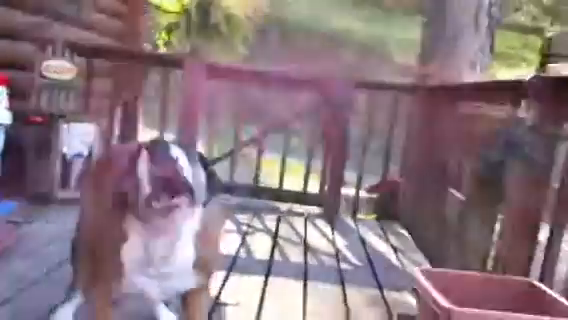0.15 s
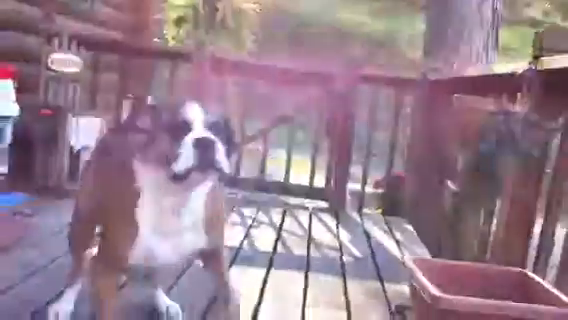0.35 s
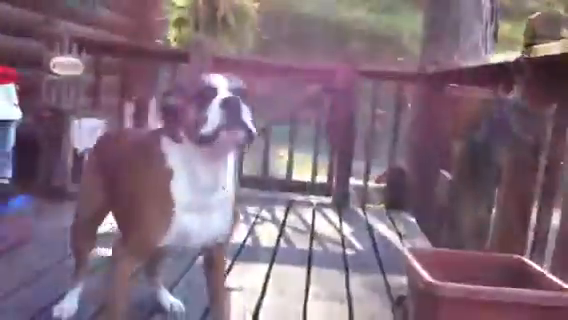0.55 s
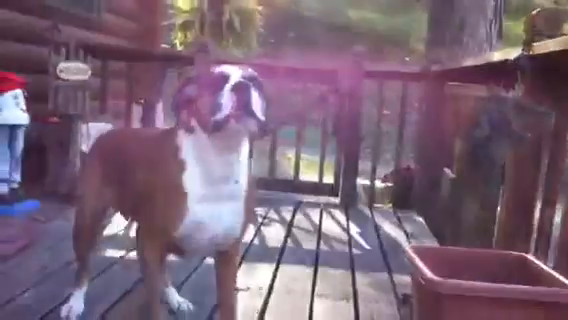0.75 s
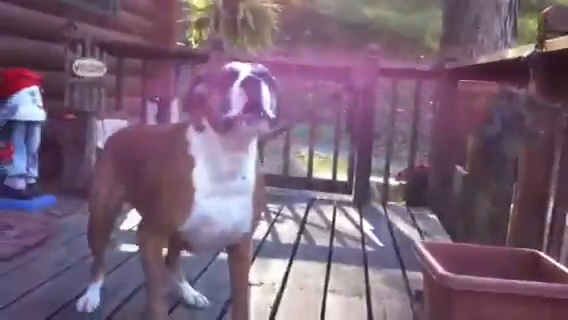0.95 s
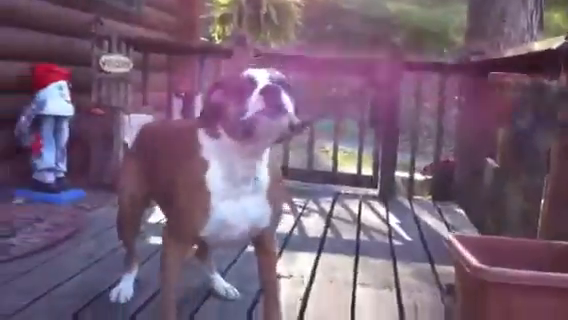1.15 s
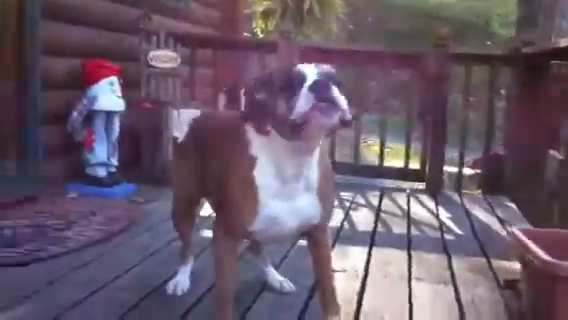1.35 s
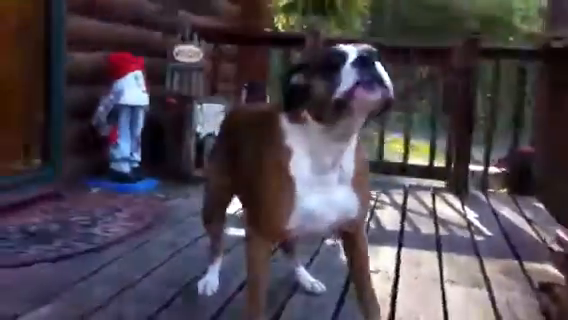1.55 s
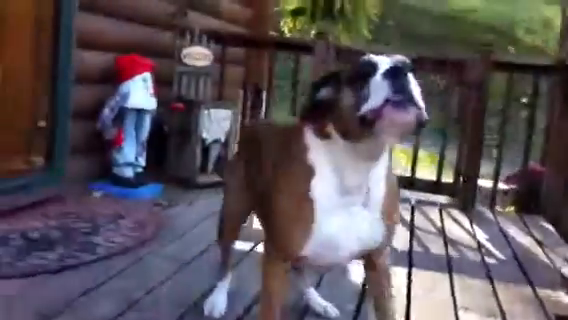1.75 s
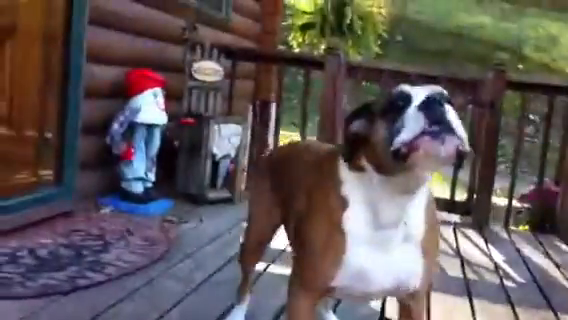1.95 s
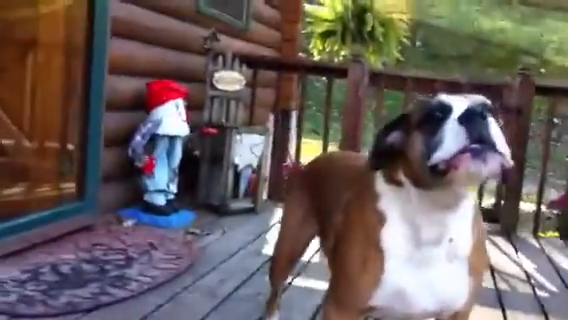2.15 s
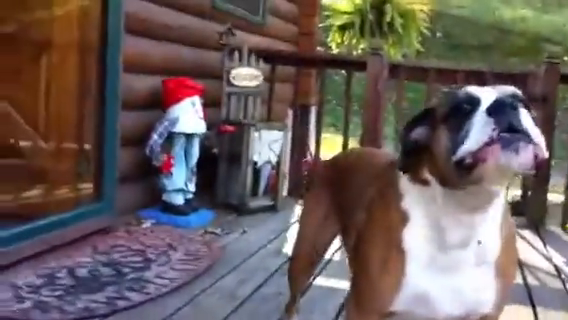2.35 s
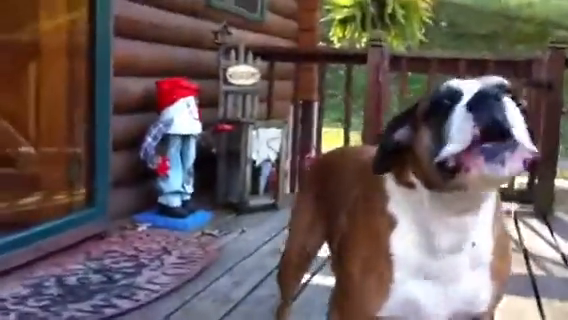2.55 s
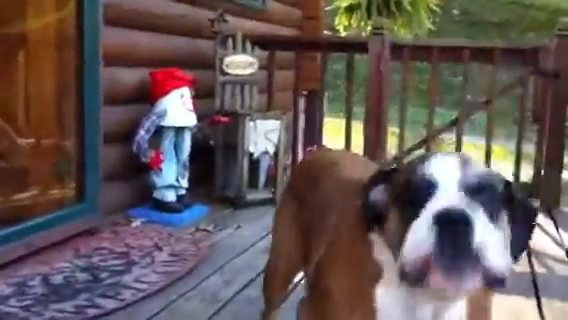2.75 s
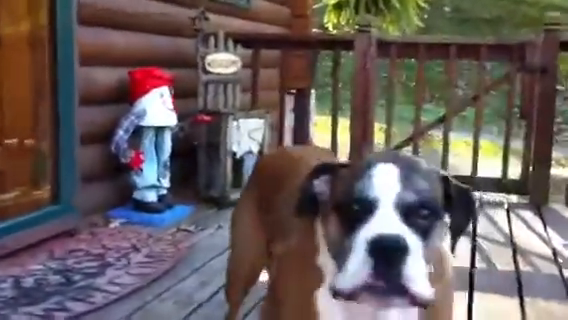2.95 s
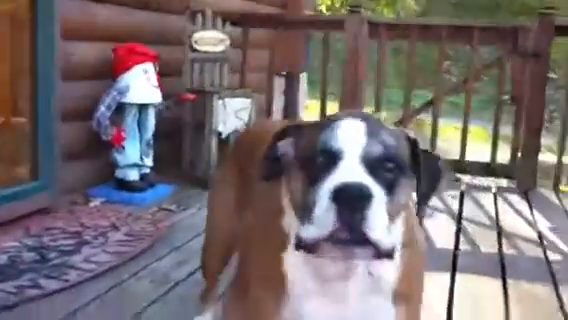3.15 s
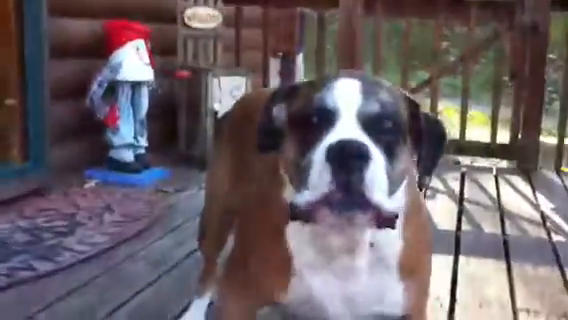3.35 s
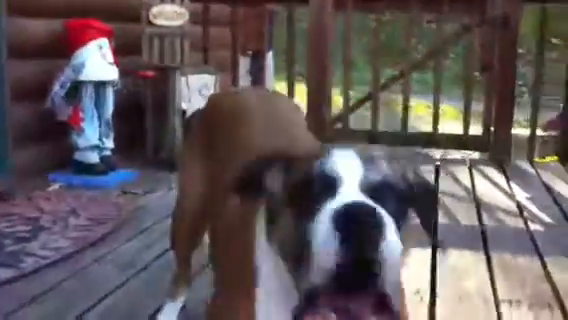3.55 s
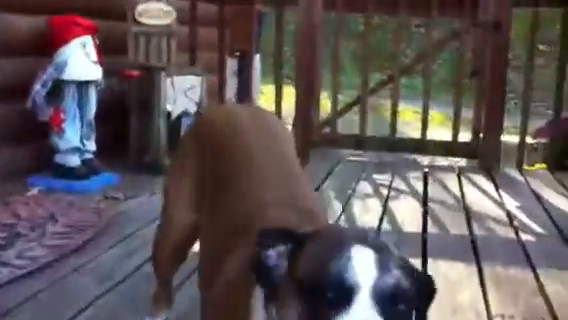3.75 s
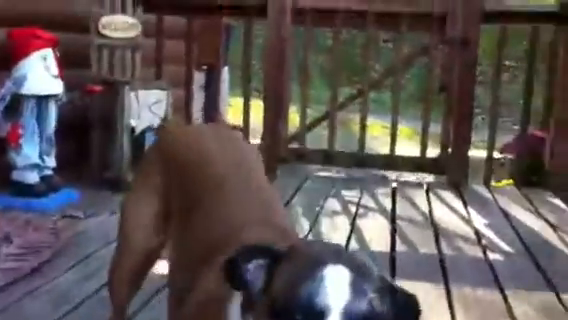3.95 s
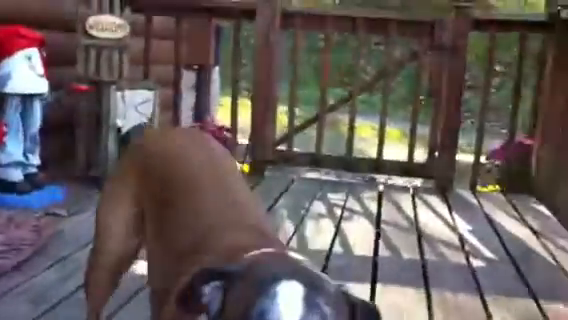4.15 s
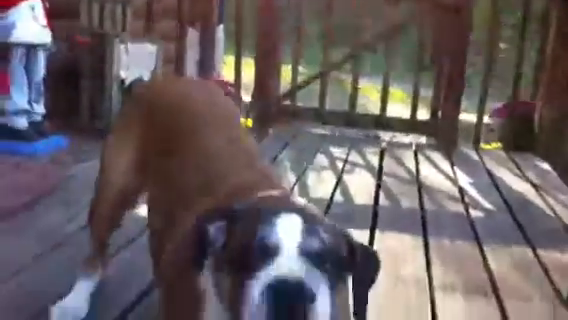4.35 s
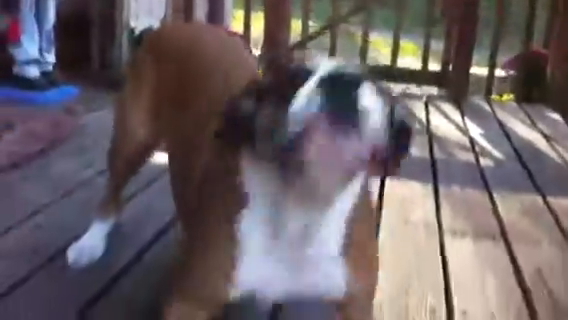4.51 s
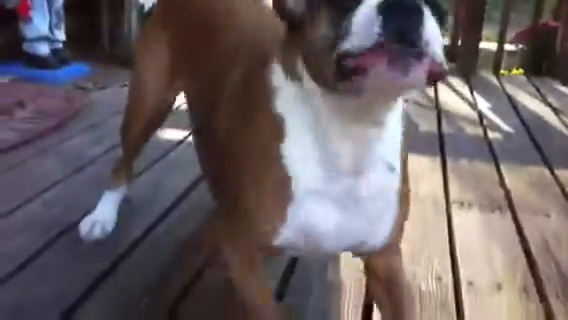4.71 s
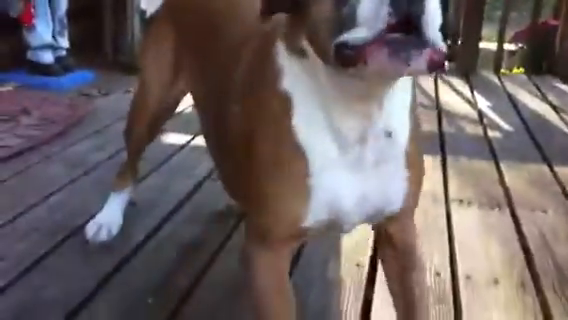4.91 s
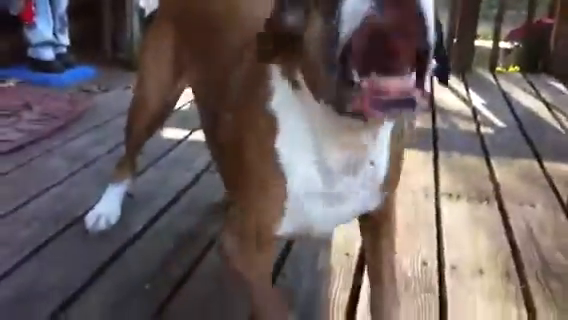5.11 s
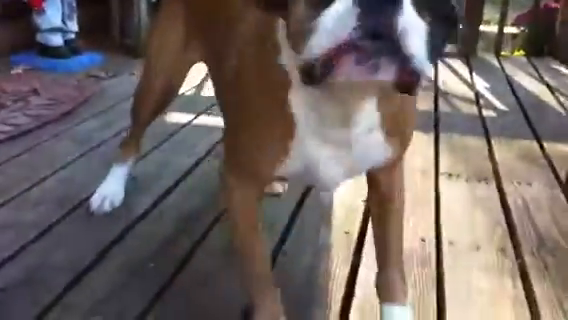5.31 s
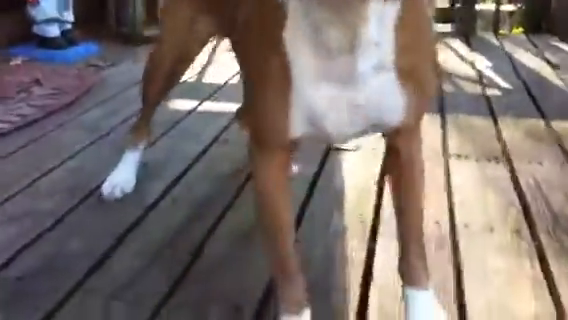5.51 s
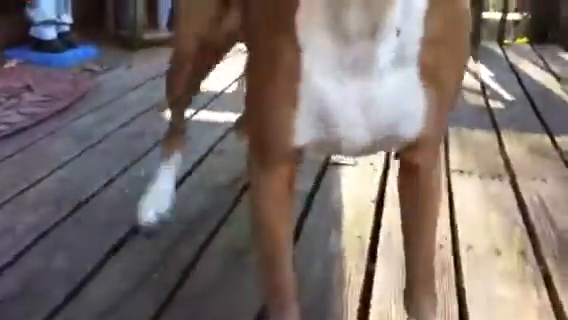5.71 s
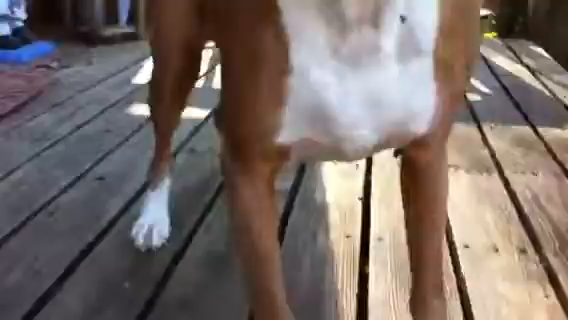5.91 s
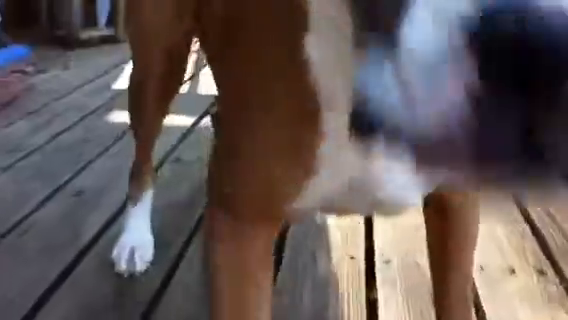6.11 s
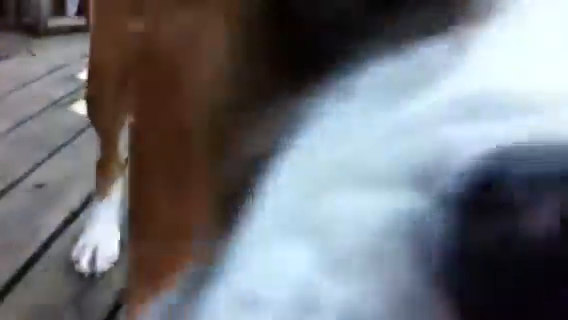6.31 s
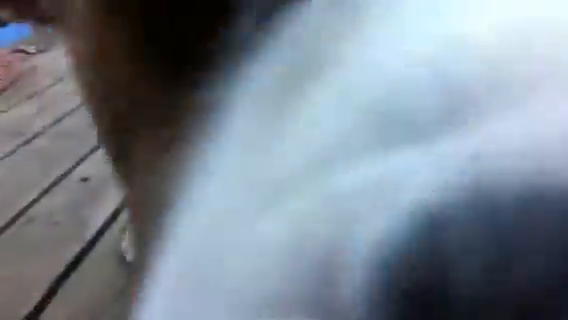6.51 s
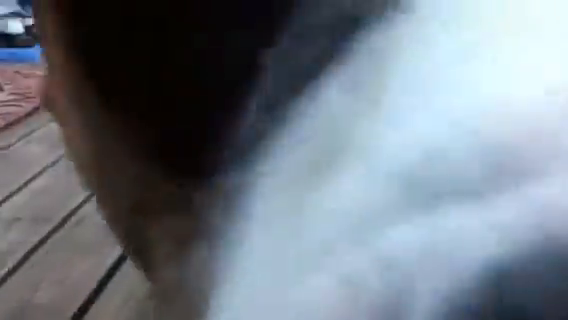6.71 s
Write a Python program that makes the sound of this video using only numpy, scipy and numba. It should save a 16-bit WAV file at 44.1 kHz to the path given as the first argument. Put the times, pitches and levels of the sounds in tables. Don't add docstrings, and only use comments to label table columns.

```python
import sys
import numpy as np
from scipy import signal
from scipy.fft import rfft, irfft
from scipy.io import wavfile
from scipy.ndimage import uniform_filter1d
from numba import njit

SR = 44100
rng = np.random.default_rng(int(sys.argv[2]) if len(sys.argv) > 2 else 0)


def unload_audio(sound):
    columns = np.transpose(np.atleast_2d(sound))
    steps = np.round(np.clip(columns, -1, 1) * 32767)
    wavfile.write(sys.argv[1], SR, steps.astype(np.int16))


def linear_from_db(decibels):
    return 10 ** (np.asarray(decibels, float) / 20)


N = 302967


def level(x, db):
    return x * linear_from_db(db) / np.sqrt(np.mean(x ** 2) + 1e-30)


def steady(x, span_s):
    k = int(span_s * SR)
    power = uniform_filter1d(uniform_filter1d(x ** 2, k), k)
    return x / np.sqrt(power + 1e-12)


def walk(rate_hz, count=N):
    k = int(SR / rate_hz)
    held = np.repeat(rng.standard_normal(count // k + 1), k)
    return uniform_filter1d(held, k)[:count]


def decay(t, t60_s):
    return np.exp(-np.log(1000) * t / t60_s)


def add_at(out, start_s, x):
    i = int(start_s * SR)
    out[i:i + len(x)] += x


@njit
def svf(x, hz, width):
    band, high, b, l = np.empty(len(x)), np.empty(len(x)), 0., 0.
    for i in range(len(x)):
        g, k = np.tan(np.pi * hz[i] / SR), width[i] / hz[i]
        v = (b + g * (x[i] - l)) / (1 + g * (g + k))
        band[i], high[i] = k * v, x[i] - k * v - l - g * v
        b, l = 2 * v - b, l + 2 * g * v
    return band, high


def resonate(x, modes):
    one, out = np.ones(len(x)), np.zeros(len(x))
    for k, (hz, width_hz, db) in enumerate(modes):
        out = out + (-1) ** k * linear_from_db(db) * svf(x, hz * one, width_hz * one)[0]
    return out


def patchy(modes, depth_db, rate_hz, count=N):
    return [(hz, width_hz, db + depth_db * walk(rate_hz, count)) for hz, width_hz, db in modes]


def swells(start_s, hold_s, db, fall_db_s):
    rise_db_s = 797
    t = np.arange(0, N, 32)[:, None] / SR
    lost_db = np.maximum(rise_db_s * (start_s - t), fall_db_s * (t - start_s - hold_s)).clip(0)
    gain = np.sqrt(np.sum(linear_from_db(db - lost_db) ** 2, axis=1))
    return np.interp(np.arange(N) / SR, t[:, 0], gain)


@njit
def folds(hz, jitter, shimmer, weak, chance):
    pulses, phase, p, k = np.zeros(len(hz) + 1), np.empty(len(hz)), 0., 0
    for i in range(len(hz)):
        step = hz[i] * np.exp(jitter[i] * chance[k, 0]) / SR
        p += step
        if p >= 1:
            p, k = p - 1, k + 1
            size = np.exp(shimmer[i] * chance[k, 1]) * (1 - weak[i] * (k % 2))
            pulses[i] += size * p / step
            pulses[i + 1] += size * (1 - p / step)
        phase[i] = p
    return pulses[:-1], phase


def barks():
    # t/s, f/Hz, level/dB, mouth opening/0-1
    woof = [(0.0, 188, -4, 0), (.01, 191.8, -18, 0.18), (0.025, 197.3, -28.5, 0.27),
            (.047, 197.5, -19, 0.12), (.061, 191.6, -32, 0.2), (.07, 186.3, -23, 0.04),
            (.088, 174, -33, .1), (.1, 182, -46.5, 0.44), (.15, 175, -62, 0.04)]
    bark_1 = [(.2, 313, -57.5, 1), (.222, 331.4, -18.5, 0.41), (0.238, 385.8, -7.5, 0.55),
              (.272, 499.2, -23, 0.65), (.29, 569.4, -16.5, 0.77), (0.31, 586.6, -10, 0.68),
              (0.328, 523.4, -22.5, 1), (0.349, 368.5, -15, 0.46), (0.388, 287.3, -64.5, 0.26)]
    bark_2 = [(2.692, 467.3, -30.5, 0.18), (2.721, 409.2, -18.5, 0.37), (2.743, 437.7, -6.5, 0.4),
              (2.758, 487.4, -15, 0.49), (2.778, 546.3, -10.5, 0.51), (2.789, 594, -18, 0.86),
              (2.828, 576.8, -6, 0.46), (2.851, 464.3, -8.5, 0.22), (2.909, 319, -71, 0.33)]
    bark_3 = [(3.638, 341, -30.5, 0.41), (3.661, 364.6, -14.5, 0.49), (3.676, 404, -9, 0.54),
              (3.686, 428.3, -7.5, 0.51), (3.693, 455.2, -19.5, 0.52), (3.742, 511.6, -8, 0.64),
              (3.76, 482.6, -22.5, 0.99), (3.785, 387, -12, 0.57), (3.825, 369, -73, .4)]
    bark_4 = [(4.513, 295, -30, 0.15), (4.531, 324.5, -20.5, 0.64), (4.536, 345.1, -9.5, 0.65),
              (4.568, 465.3, -9, 0.62), (4.59, 493.3, -17, 0.83), (4.628, 511.2, -18.5, 0.67),
              (4.652, 410.5, -26.5, 1), (4.668, 326.5, -19.5, 0.56), (4.699, 265, -78, 0.42)]
    bark_5 = [(5.248, 325.9, -21.5, 0.49), (5.268, 362, -9.5, 0.51), (5.282, 396.4, -12, 0.66),
              (5.301, 436.3, -13.5, 0.63), (5.306, 457.7, -28, 0.27), (5.335, 539.7, -18, 0.69),
              (5.362, 529, -13.5, 0.47), (5.391, 406, -26.5, 0.18), (5.43, 357, -67, 0.52)]
    # t of most air/s, breath level/dB, roughness/0-1, weak alternate pulse/0-1
    pushes = [
        (-.02, -33.5, 0.49, 0.05),
        (0.329, -32.5, 0.27, 0.3),
        (2.82, -28.5, 0.21, 0.79),
        (3.759, -27.5, 0.18, 0.73),
        (4.621, -26.5, 0.07, 0.7),
        (5.358, -32.5, 0.28, 0.3),
    ]
    # middle t/s, half length/s, hoarse start/s, resonance f scale/ratio
    uneven = [(0.0, 0.02, 0.022, 1.017), (0.323, 0.027, 0.01, 0.95), (2.814, 0.024, 0.019, 0.97),
              (3.725, 0.021, .02, 0.98), (4.563, 0.0087, 0.017, 1.03), (5.356, 0.03, .015, 1.007)]
    # extra level/dB on the resonances near 560, 800, 1050, 1460, 1730 Hz
    vowels = [(1, 2.2, 8.1, 5, -14.5), (-0.3, 1.8, -1.5, -2.5, -0.5), (-2.5, 0.1, 1.1, 3, 7.8),
              (1.6, 0.84, -1.5, -4.2, 2), (-0.5, 0.3, 4, 4.1, 0.1), (1.3, 0.1, 0, -2.5, -2)]
    late_vowels = [(-2, 3.9, 8, 2, 4.1), (3.9, 2.3, -8, 0.8, 0.1), (-1.6, 0.1, -1.5, 2.5, 2.3),
                   (5, 0.81, -3.5, 4, 0.1), (3.2, 0.1, -0.5, 4, 2.1), (1.9, 0.1, -2, 4.5, 4.1)]
    # f at most air/Hz, rise/(Hz/s), level over breath/dB
    teeth_rings = [(4600, 100, -10), (4420, 3300, -9), (4700, 2800, -4.5), (4740, 3400, -6),
                   (5040, 3800, -0.5), (4630, 10000, -3.5)]
    # f at most air/Hz, rise/(Hz/s), width/Hz
    pockets = [(3080, 500, 400), (3100, 999, 300), (3080, 1000.5, 270), (3100, 999.5, 420),
               (3200, 2500, 530), (3630, -2000, 700)]
    out = np.zeros(N)
    curves = (woof, bark_1, bark_2, bark_3, bark_4, bark_5)
    for curve, push, patch, vowel, late, teeth, pocket in zip(
            curves, pushes, uneven, vowels, late_vowels, teeth_rings, pockets):
        add_at(out, curve[0][0], bark(curve, *push, *patch, vowel, late, *teeth, *pocket))
    return out


def bark(curve, push_s, air_db, rough, weak, uneven_s, half_s, hoarse_s, stretch, vowel_db, late_db,
         teeth_hz, teeth_hz_s, teeth_db, pocket_hz, pocket_hz_s, pocket_width_hz):
    # f/Hz, width/Hz, level mouth shut/dB, level mouth open/dB
    tract_modes = [(216, 130, -9.5, -37.5), (560, 128.5, 13.5, -17), (801, 145, 5.5, -0.5),
                   (1077, 267, -11.5, -5.5), (1452, 256, -15, -7), (1754, 298, -24.5, -2),
                   (2230, 840, -24.5, -12), (2904, 900, -29, -31)]
    # f/Hz, width/Hz, level/dB
    breath_modes = [(2940, 450, -1), (3580, 1300, 4.5), (4025, 1900, 3.5), (5070, 890, 0), (5430, 820, -5),
                    (6800, 1200, -1.5), (6990, 510, -3.5), (8900, 450, -10.5), (10000, 1300, -18.5),
                    (11300, 800, -10), (13100, 500, -12), (14300, 660, -19.5), (10750, 15000, -23.5)]
    # t from most air/s, level/dB
    breath_shape = [(-.1, -9.5), (-.05, -4.5), (0, -0.5), (.024, -2.5), (.033, -12), (.09, -27.5)]
    vowel_turn = (-.07, -.03)
    s, *columns = np.transpose(curve)
    t = np.arange(s[0], s[-1], 1 / SR)
    n, one, push_t = len(t), np.ones(len(t)), t - push_s
    hz, db, mouth = (np.interp(t, s, c) for c in columns)

    breath_db = air_db + np.interp(push_t, *np.transpose(breath_shape))
    breath_db = breath_db + 3.4 * np.minimum(np.maximum.accumulate(db) - db.max() + 10.5, 0)

    weak_share = 0.24
    weak = weak * (weak_share + (1 - weak_share) * np.exp(-((t - uneven_s) / half_s) ** 2))
    weak = np.clip(weak, 0, 1)
    calm = 0.56 * rough + 0.015
    rough = np.clip(rough + 0.35 * np.exp(-(t - t[0]) / hoarse_s), 0, 1)
    chance = np.tanh(rng.standard_normal((400, 2)))
    pulses, phase = folds(hz, 0.046 * (calm + rough), 0.93 * (calm + rough), weak, chance)
    pulses = level(pulses, 0)
    puff = np.exp(-phase / 0.63) * rng.standard_normal(n)
    rasp = signal.sosfilt(signal.butter(2, 1100, "high", fs=SR, output="sos"), puff)

    resonance_scale = stretch - 1.4 * np.clip(.3 - mouth, 0, .4)
    vowel = [np.interp(push_t, vowel_turn, pair) for pair in zip(vowel_db, late_db)]
    tract = []
    for (f, width_hz, shut_db, open_db), extra_db in zip(tract_modes, (0, *vowel, 0, 0)):
        mode_db = shut_db + mouth * (open_db - shut_db) + extra_db
        tract.append((f * resonance_scale, width_hz, mode_db / 2))
    tract = patchy(tract, 0.99, 39.6, n)
    voice = pulses + rough * (.8 * puff + 9 * rasp)
    voice = resonate(resonate(voice, tract), tract)
    for _ in range(3):
        voice = svf(voice, 0.87 * hz, 1.51 * 0.4 * hz)[1]
    voice = voice - 0.56 * resonate(voice, [(370, 150, 0)])

    jet = pulses + 10 * rough * puff
    air = resonate(jet, patchy(breath_modes, 3.5, 45, n))
    teeth_width_hz = 220
    teeth = svf(jet, teeth_hz + teeth_hz_s * push_t, teeth_width_hz * one)[0]
    air = level(air, 0) + level(teeth, teeth_db - 5)
    flutter_db = 2.0 * walk(120, n)

    fade = np.minimum(1, np.minimum(t - t[0] + 1 / SR, t[-1] - t) / 0.003)
    sound = linear_from_db(db) * steady(voice, 0.028) + linear_from_db(breath_db + flutter_db) * steady(air, 0.027)
    sound = fade * sound
    for _ in range(2):
        sound = sound - 0.62 * svf(sound, pocket_hz + pocket_hz_s * push_t, pocket_width_hz * one)[0]
    return sound


def grumble():
    # start t/s, hold/s, throat level/dB, throat f/Hz, mouth relative level/dB
    growls_and_huffs = [(1.1, 0.011, -52, 443, -1.5), (3.27, 0.2, -45, 932, -8), (3.44, 0.052, -56.5, 914, 3.5),
                        (3.51, 0.29, -40.5, 733, -9), (4.04, 0.16, -42.5, 600, -10.5), (4.235, 0.066, -49.5, 506, -9),
                        (4.425, 0.016, -41.5, 588, -19), (4.463, .2, -38, 536, -12.5), (4.72, .05, -51, 1015, -8.5),
                        (4.775, 0.049, -44, 720, -10), (4.84, 0.064, -40, 642, -12.5),
                        (4.92, 0.039, -46.5, 733, -1.5), (4.98, 0.19, -48, 861, -6.5),
                        (0.156, 0.088, -52.5, 807, -0.5), (0.375, 0.0067, -39.5, 597, -14),
             (0.521, 0.071, -48.5, 597, -3), (0.652, 0.067, -53, 515, -9), (0.769, 0.01, -52.5, 509, -10.5),
             (0.93, 0.12, -55.5, 614, 3), (1.04, 0.07, -44.5, 1136, -12), (1.19, 0.036, -58, 514, -5),
             (1.418, 0.042, -55, 510, -6.5), (1.584, 0.058, -56.5, 538, -1),
             (1.969, 0.15, -53.5, 560, -3.5), (2.275, 0.038, -59, 543, -0.5), (2.367, 0.081, -50, 466, -9),
             (2.45, 0.1, -60, 426, -12.5), (2.592, 0.12, -50, 455, -13), (2.89, 0.1, -50, 493, -12.5),
             (3.031, 0.085, -52, 507, -12), (3.826, 0.14, -55, 635, -10), (5.431, 0.2, -49, 621, -10),
             (5.7, 0.048, -53, 693, -4), (5.799, 0.038, -47.5, 429, -5.5), (5.924, 0.099, -56, 511, -3),
             (6.277, 0.11, -56.5, 440, -4), (6.481, 0.16, -57.5, 685, 3), (6.708, 0.14, -62.5, 670, 1.5)]
    # start t/s, hold/s, level/dB
    rumbles = [(0.048, 0.07, -42.5), (0.225, 0.0098, -45), (0.38, 0.013, -54), (0.538, 0.12, -52),
               (0.93, 0.093, -54), (1.091, 0.065, -48), (1.361, 0.11, -54), (1.617, 0.022, -58),
               (1.982, 0.1, -55), (2.291, 0.23, -54.5), (2.587, 0.15, -51), (2.84, 0.071, -61),
               (3.07, 0.056, -57), (3.293, 0.4, -51), (3.722, 0.032, -53), (3.787, 0.38, -59),
               (4.02, 0.26, -46.5), (4.418, 0.15, -45), (4.66, 0.038, -48), (4.775, 0.37, -51),
               (5.232, 0.15, -44.5), (5.573, 0.18, -52), (5.826, 0.06, -57), (5.926, 0.15, -62.5),
               (6.554, 0.12, -57.5)]
    # multiple of throat f, width/Hz, level/dB
    throat_modes = [(1, 85, 1.5), (.75, 64, -2)]
    # f/Hz, width/Hz, level/dB
    jaw_modes = [(473, 500, -4.5), (1150, 640, -3.5)]
    mouth_modes = [(1595, 420, -2), (2167, 220, 1.5), (2485, 180, 0), (3300, 300, -4)]
    chest_modes = [(137.6, 23, 2), (258, 70, 0.5)]
    throat_fall_db_s, chest_fall_db_s = 245.5, 295
    shape_s, drift = 0.0046, .025
    s, hold_s, db, hz, mouth_db = np.transpose(sorted(growls_and_huffs))
    now = np.searchsorted(s[1:] - shape_s / 2, np.arange(N) / SR)
    throat_hz, open_db = (uniform_filter1d(c[now], int(shape_s * SR)) for c in (hz, mouth_db))
    throat_hz = throat_hz * np.exp(drift * walk(13))

    one, chance = np.ones(N), np.tanh(rng.standard_normal((2000, 2)))
    flaps, phase = folds(65 * linear_from_db(2.5 * walk(6)), .5 * one, 0.75 * one, 0 * one, chance)
    puff = (.7 + np.exp(-phase / 0.5)) * rng.standard_normal(N)
    source = level(signal.lfilter([1], [1, -.9], flaps), -17) + level(puff, -1)

    throat = patchy([(k * throat_hz, w, d / 2) for k, w, d in throat_modes], 1.5, 25)
    jaw = patchy([(f, w, d / 2) for f, w, d in jaw_modes], 1.5, 15)
    throat_sound = resonate(resonate(source, throat), throat)
    throat_sound = throat_sound + linear_from_db(0.65 * open_db) * resonate(resonate(source, jaw), jaw)

    follow = (throat_hz / 700) ** 0.19
    lips = [(f * follow * np.exp(drift * walk(9)), w, d) for f, w, d in mouth_modes]
    mouth_sound = resonate(resonate(puff, lips) + .15 * puff, patchy(lips, 4.0, 16))
    chest_sound = resonate(source, patchy(chest_modes, 4.5, 8))

    throb = linear_from_db(2.2 * walk(50))
    out = throb * swells(s, hold_s, db, throat_fall_db_s) * steady(throat_sound, 0.39)
    out = out + swells(s, hold_s, db + mouth_db, throat_fall_db_s) * steady(mouth_sound, 0.39)
    return out + swells(*np.transpose(rumbles), chest_fall_db_s) * steady(chest_sound, 0.39)


def nose():
    # start t/s, hold/s, level/dB
    pants = [(0.159, 0.15, -48.5), (0.383, 0.032, -57), (0.479, 0.22, -57.5), (0.929, 0.24, -62),
             (1.531, 0.14, -58), (1.955, 0.0088, -61), (2.015, 0.15, -57.5), (2.269, 0.033, -61),
             (2.4, 0.023, -57), (2.558, 0.24, -64), (2.912, 0.21, -60.5), (3.293, 0.15, -68),
             (3.464, 0.46, -58.5), (3.816, 0.12, -57), (4.063, 0.16, -54), (4.467, 0.046, -47),
             (4.716, 0.24, -54.5), (5, 0.11, -56.5), (5.404, 0.2, -59.5), (5.784, 0.11, -56),
             (5.922, 0.017, -65), (5.997, 0.15, -64), (6.264, 0.25, -57), (6.486, 0.13, -48),
             (6.66, 0.12, -51), (6.8, .1, -57.5)]
    # f/Hz, width/Hz, level/dB
    nose_modes = [(3370, 1300, -0.5), (5400, 1900, -1), (6330, 490, 3), (8500, 2100, -6.5),
                  (11800, 2900, -4.5), (14700, 1800, -12.5)]
    # start t/s, hold/s, level/dB
    whistles = [
        (2.306, 0.66, -67),
        (3.352, 0.41, -65),
        (6.497, 0.16, -54.5),
    ]
    # f/Hz, width/Hz, level/dB
    nostril_modes = [(6000, 250, -3), (6820, 303, -2.5), (3350, 150, -7.5)]
    fall_db_s = 186
    hiss = resonate(rng.standard_normal(N), patchy(nose_modes, 1.5, 10))
    whistle = resonate(rng.standard_normal(N), patchy(nostril_modes, 4, 20))
    sniff = linear_from_db(2.5 * walk(25))
    out = sniff * swells(*np.transpose(pants), fall_db_s) * steady(hiss, 0.39)
    return out + swells(*np.transpose(whistles), fall_db_s) * steady(whistle, 0.39)


def gulps():
    # t/s, peak level/dB, ring f/Hz
    gulp_events = [(4.06, -31, 600), (4.087, -25.5, 612), (4.113, -26.5, 624), (4.165, -27.5, 560),
                   (4.277, -29, 512), (4.414, -33, 560), (4.428, -25.5, 578), (4.464, -25.5, 517),
                   (4.845, -28, 700), (4.865, -30.5, 592), (4.883, -35, 595), (4.925, -30, 676),
                   (4.95, -35, 770)]
    rise_s, t60_s = 0.0032, 0.053
    out, t = np.zeros(N + SR), np.arange(SR // 5) / SR
    for s, db, hz in gulp_events:
        ring = np.sin(2 * np.pi * hz * t)
        ring = ring + .45 * np.sin(2 * np.pi * 0.96 * hz * t) + 0.18 * np.sin(2 * np.pi * .72 * hz * t)
        add_at(out, s, linear_from_db(db + 2.5) * ring * (1 - np.exp(-t / rise_s)) * decay(t, t60_s))
    return out[:N]


def claws():
    # t/s, tick peak level/dB, plank f/Hz
    ticks = [(0.157, -31.5, 982), (0.6473, -27.5, 367), (.7725, -51, 500), (0.92, -39.5, 560),
             (1.0969, -22.5, 382), (1.406, -45, 560), (1.448, -32.5, 560), (1.53, -32.5, 910),
             (1.5163, -49, 704), (1.5698, -33, 1110), (1.6813, -31, 362), (1.8416, -38.5, 293),
             (1.9457, -46.5, 1150), (1.9531, -34, 700), (1.9649, -25, 552), (2.0196, -29.5, 1110),
             (2.393, -30, 417), (2.426, -26, 433), (3.0704, -25.5, 486), (3.3153, -30.5, 910),
             (4.217, -25, 534), (5.1596, -29.5, 810), (5.46, -34, 600), (5.9309, -28.5, 564),
             (5.9487, -26.5, 490), (6.1757, -37.5, 1180), (6.2254, -41, 678), (6.4995, -34.5, 715),
             (6.73, -29.5, 974)]
    # t/s, tick peak level/dB, knock relative level/dB, plank f/Hz
    paw_steps = [(0.8705, -61.5, 20, 466), (1.1418, -48.5, 21, 463), (2.2762, -41.5, -16.5, 436),
                 (2.5856, -34, -27, 415.5), (2.6564, -33.5, -6, 296), (3.2665, -48.5, 11, 914),
                 (3.4603, -24.5, -16, 736), (3.921, -28, -6, 790), (4.0586, -35, 3, 580),
                 (4.1128, -22.5, -3, 663), (4.3031, -48.5, 12, 522), (4.4667, -26, 2, 520),
                 (4.7762, -27.5, -19, 740), (4.8589, -21.5, -12, 520), (4.9478, -27, -4.5, 776),
                 (5.703, -36.5, -4.5, 388), (5.7498, -40, -12, 890), (5.8032, -36, -2, 375),
                 (5.8348, -32.5, -9, 374), (6.2692, -44, -6, 395), (6.339, -37.5, -6, 1140)]
    # t/s, peak level/dB, ring f/Hz
    scuffs = [(1.063, -38, 2570), (1.1747, -51, 2380), (1.1897, -55, 1660), (1.221, -46, 1750),
              (1.2447, -49.5, 1680), (1.381, -47, 2580), (2.572, -44.5, 2050), (4.278, -43, 1470),
              (4.299, -41, 2500), (4.111, -31, 1750), (5.035, -36, 2040), (0.1569, -40.5, 2090)]
    claw_knock_db, knock_t60_s, scuff_t60_s = -20, 0.021, 0.016
    out, t = np.zeros(N + SR), np.arange(SR // 5) / SR
    bright = signal.butter(2, [1400, 9000], "band", fs=SR, output="sos")
    crack = np.exp(-t / 0.00019)
    bounce = 0.1 * (t > .0013) * np.exp(-np.abs(t - .0013) / 0.00015)
    shape = crack + bounce + 0.22 * decay(t, 0.064)
    for s, db, knock_db, hz in paw_steps + [(s, db, claw_knock_db, hz) for s, db, hz in ticks]:
        tick = signal.sosfilt(bright, rng.standard_normal(len(t)) * shape)
        knock = np.sin(2 * np.pi * hz * t) * decay(t, knock_t60_s) * (1 - np.exp(-t / 0.0008))
        add_at(out, s, linear_from_db(db) * (tick / np.abs(tick).max() + linear_from_db(knock_db + 4.5) * knock))
    for s, db, hz in scuffs:
        add_at(out, s, linear_from_db(db) * np.sin(2 * np.pi * hz * t) * decay(t, scuff_t60_s))
    return out[:N]


def porch(x):
    # delay/s, level/dB
    echoes = [
        (.0031, -17),
        (.0074, -19.5),
        (.0128, -17.5),
    ]
    t60_s, tail_db = 0.12, -18
    t = np.arange(int(.4 * SR)) / SR
    tail = rng.standard_normal(len(t)) * (t > .004) * decay(t, t60_s)
    tail = signal.lfilter([1], [1, -.6], tail)
    tail = linear_from_db(tail_db) * tail / np.sqrt(np.sum(tail ** 2))
    for delay_s, db in echoes:
        tail[int(delay_s * SR)] += linear_from_db(db)
    return signal.fftconvolve(x, tail)[:N]


def outdoors():
    # f/Hz, density/dB
    air_spectrum = [(25, -15), (59, -12), (100, -5.5), (471, 1), (648, -4.5), (1680, -7), (12100, -20),
                    (15600, -30)]
    hz, db = np.transpose(air_spectrum)
    f = np.arange(N // 2 + 1) * SR / N + 1
    gain = linear_from_db(np.interp(np.log(f), np.log(hz), db))
    return level(irfft(rfft(rng.standard_normal(N)) * gain, N), -62.5)


def scene():
    echoing = barks() + gulps() + claws()
    return (echoing + porch(echoing) + grumble() + nose() + outdoors())[None]


def roll_off(x):
    return signal.sosfilt(signal.butter(12, 16510, fs=SR, output="sos"), x)


def record(dry):
    mic_hz, top_hz, leak_db = 105, 16100, -22
    x = 0.88 * np.tanh(dry / 0.77)
    x = signal.sosfilt(signal.butter(3, mic_hz, "high", fs=SR, output="sos"), x) - linear_from_db(leak_db) * x
    x = x + 0.024 * x ** 2
    x = signal.sosfilt(signal.ellip(8, .2, 60, top_hz, fs=SR, output="sos"), x)
    return roll_off(x)


dry = scene()
out = record(dry)
unload_audio(out)
```